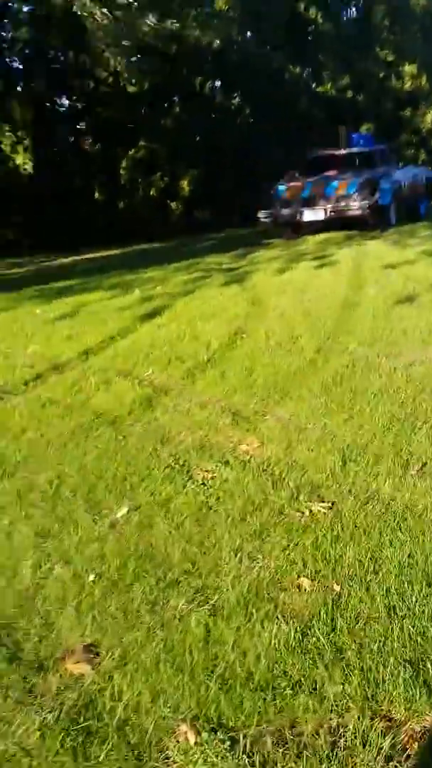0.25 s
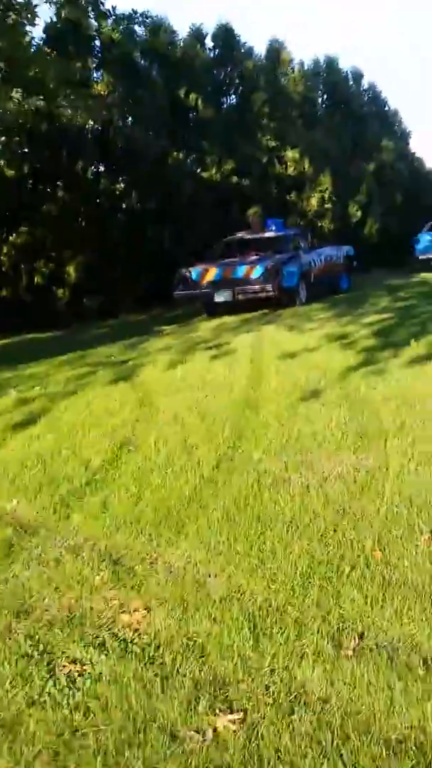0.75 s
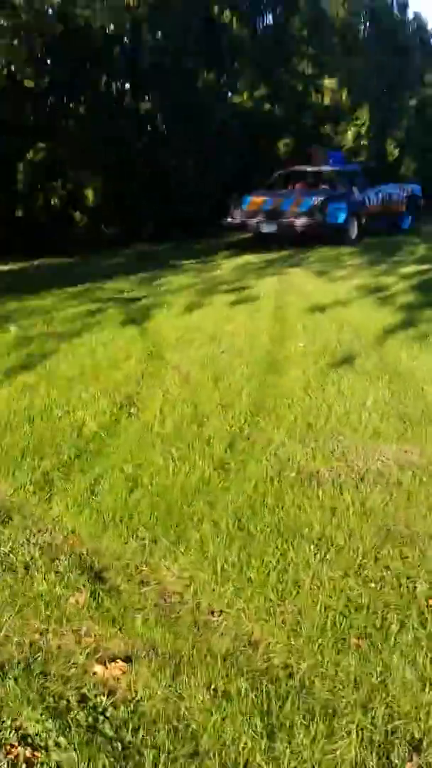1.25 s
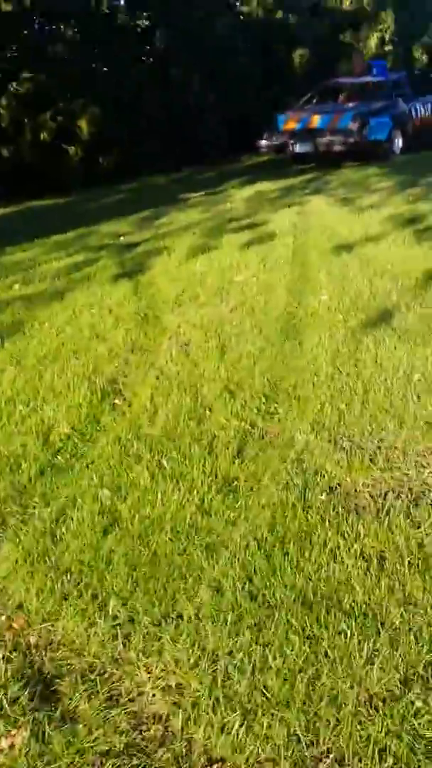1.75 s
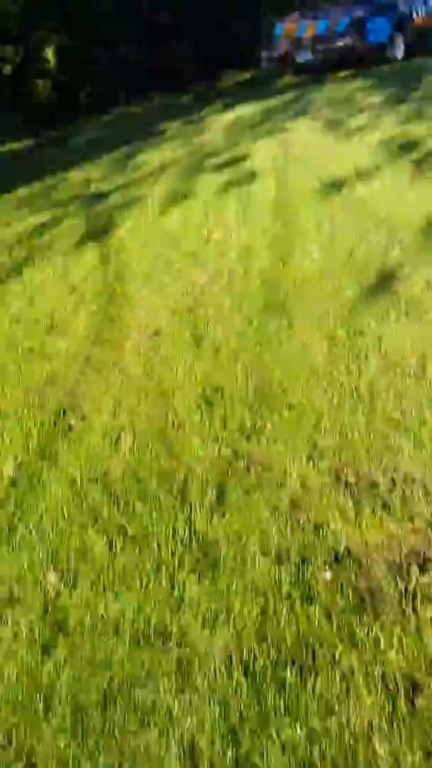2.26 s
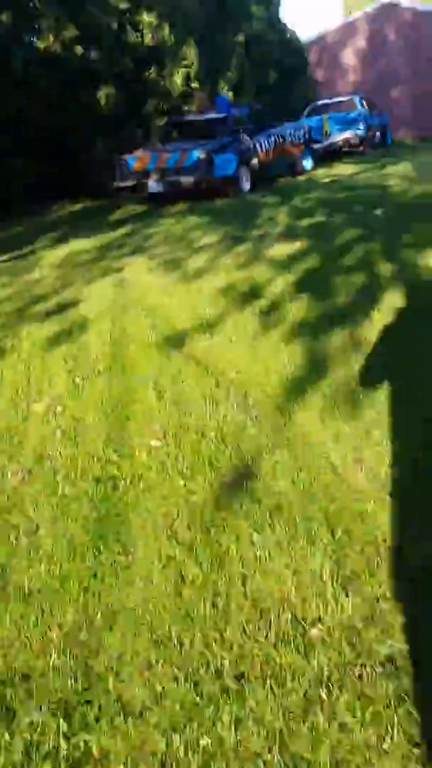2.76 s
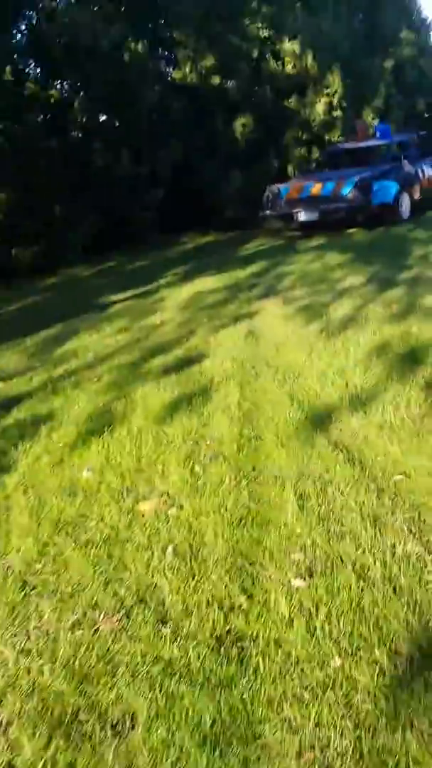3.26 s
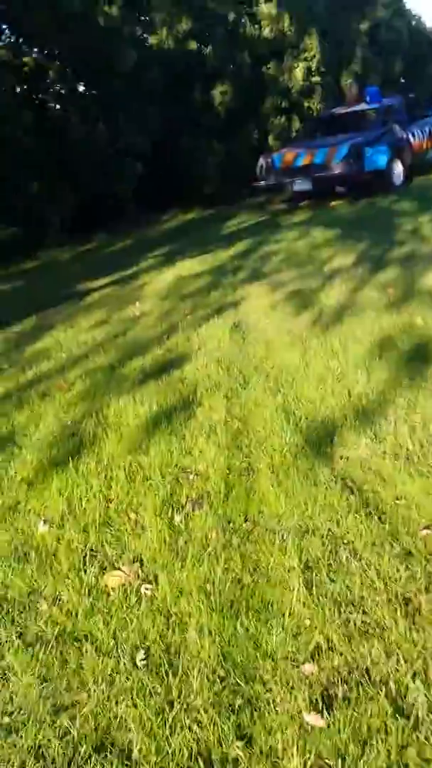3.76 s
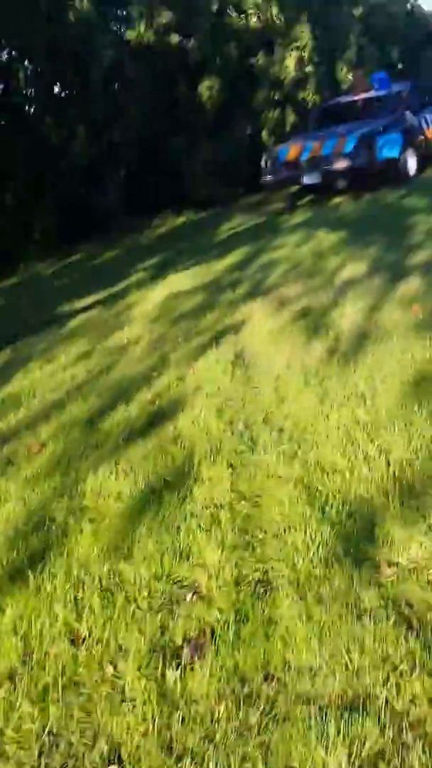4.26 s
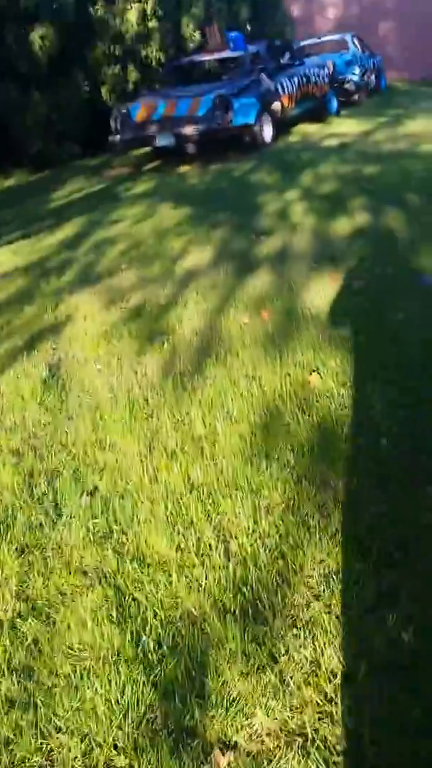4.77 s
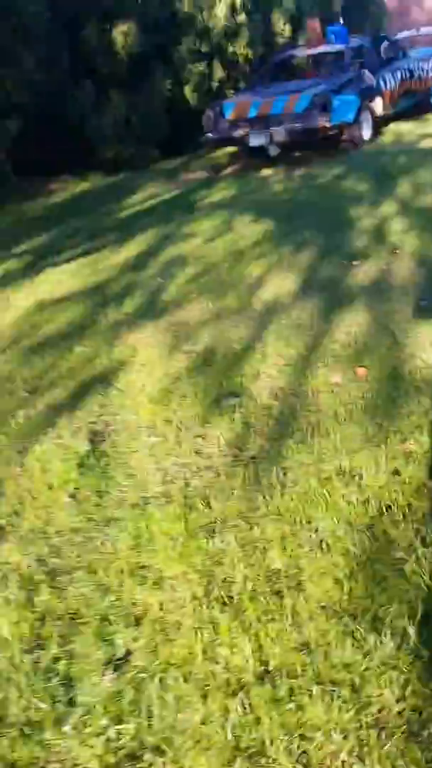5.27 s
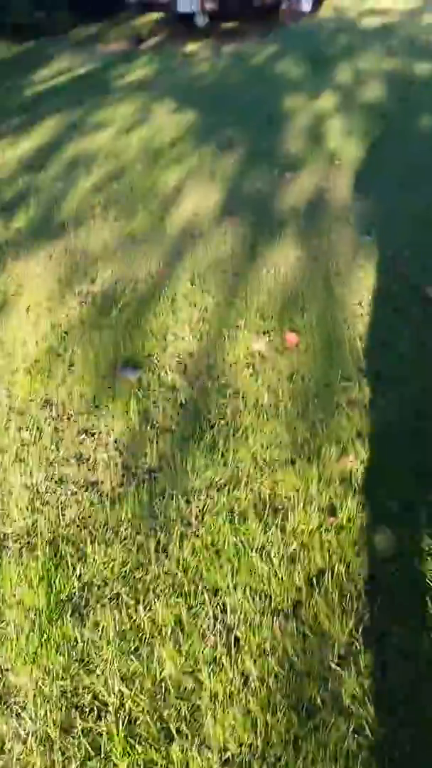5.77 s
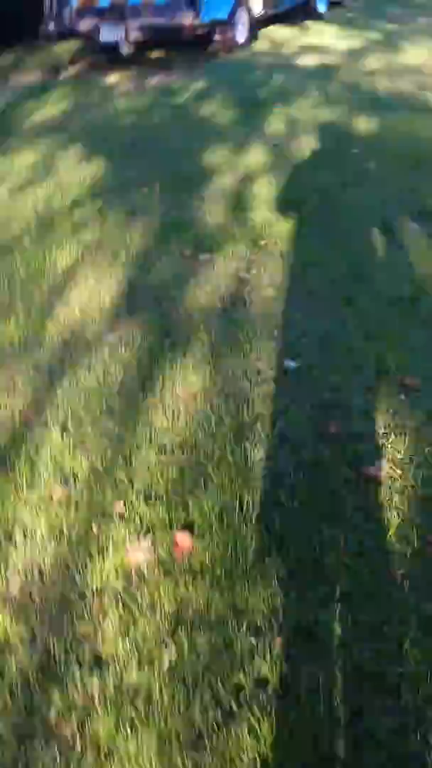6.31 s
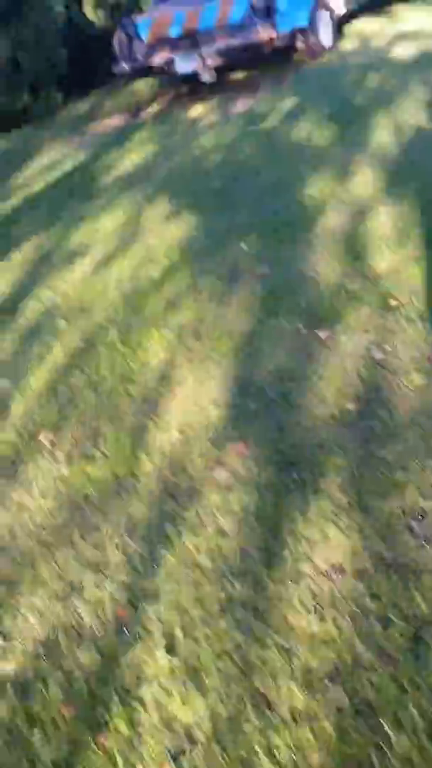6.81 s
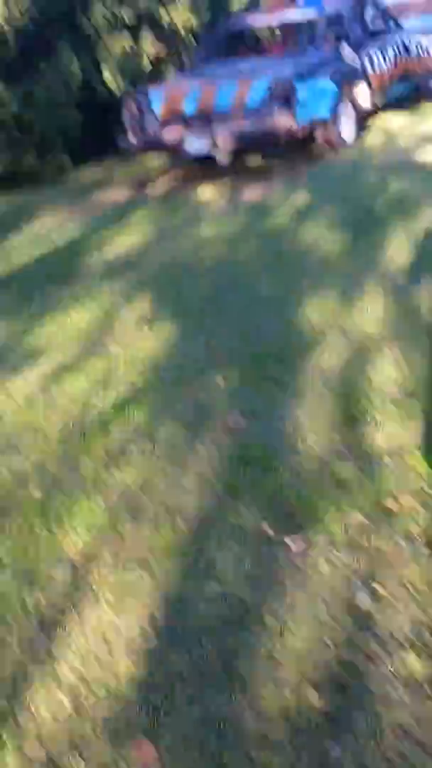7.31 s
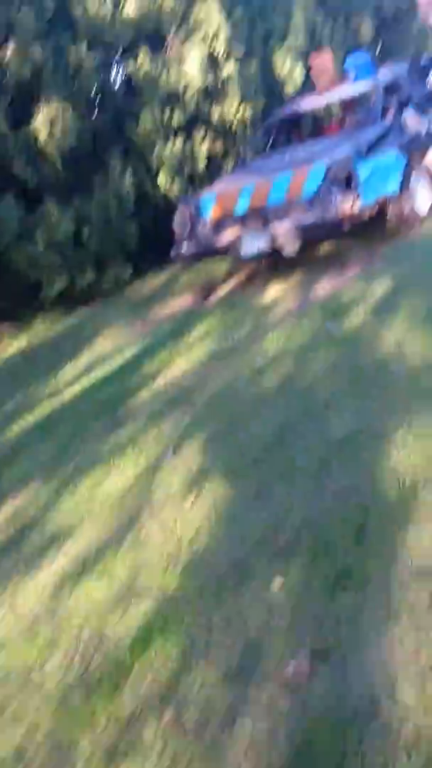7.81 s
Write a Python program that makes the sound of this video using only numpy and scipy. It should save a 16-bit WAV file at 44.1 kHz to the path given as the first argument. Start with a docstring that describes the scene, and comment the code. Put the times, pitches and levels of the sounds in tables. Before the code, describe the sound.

An old eight-cylinder car with open pipes idles loudly as it creeps over a lawn. Its low, uneven rumble carries raspy puffs, a metallic ring and a steady hiss. After a second, sharp exhaust cracks begin; the idle then sags and stumbles now and then while the cracks grow more frequent. One soft step lands in the grass. It is heard from a walking phone some metres away, in a faint breeze.

```python
"""An old eight-cylinder car with open pipes idles and creeps over a lawn, some metres from a walking phone.
From the start each firing booms in the pipes, spits a puff of gas and rings the metal; uneven cylinders
make it lope. Fan and intake hiss underneath, coloured differently by each microphone port, in a faint
breeze. The rasp sings briefly at 0.6 s and twice later. From 1 s some puffs crack; from 2 s the idle
sags and stumbles now and then. A soft step lands in the grass at 5.5 s, and the cracks crowd to the end."""
import sys
import numpy as np
from scipy import signal
from scipy.fft import rfft, irfft, next_fast_len
from scipy.io import wavfile
from scipy.ndimage import uniform_filter1d

SR = 44100
rng = np.random.default_rng(int(sys.argv[2]) if len(sys.argv) > 2 else 0)


def bounce(signal):
    """Save signal as a 16-bit WAV file at the path given by the first command-line argument."""
    frames = np.transpose(np.atleast_2d(signal))
    limited = np.clip(frames, -1, 1)
    pcm = np.round(limited * 32767).astype(np.int16)
    wavfile.write(sys.argv[1], SR, pcm)


N = 355005
T = np.arange(N) / SR
SIZE = next_fast_len(N)
HZ = np.fft.rfftfreq(SIZE, 1 / SR) + 1e-3
STEP, LEFT_LAG = 8, 8  # samples: between envelope points, of delay to the left port
IDLE_PER_S = 44  # firings per s at plain idle

# cylinder strengths in firing order: boom/dB, puff/dB
CYLINDERS = [(-4, 4), (-2, 6.5), (-1.5, 3), (-2, 6.5), (-1, 6), (-2.5, 4.5), (-3, 6), (-1.5, 3.5)]
# the sharpest puffs: t/s, relative level/dB, centre of the spit/Hz
CRACKS = [(1.042, -7, 5530), (1.53, -9, 6300), (1.701, -8, 5470), (1.8746, -6, 6350), (1.941, -6, 5770),
          (1.984, -6.5, 4980), (2.0298, -9, 4910), (2.052, -5, 3930), (2.395, -8, 6070),
          (2.7582, -3.5, 5450), (2.878, -6, 6600), (2.9233, -6, 4770), (2.948, -5, 6020),
          (3.0995, -6.5, 6080), (3.1214, -6, 6660), (3.4795, -6, 6070), (3.6643, -3.5, 6000),
          (3.822, -3.5, 6170), (3.846, -5.5, 5850), (4.025, -4, 6540), (4.208, -7, 6330),
          (4.393, -3.5, 3500), (4.4675, -8, 5580), (4.565, -7.5, 5000), (4.703, -6.5, 4500),
          (4.75, -8, 5000), (4.9256, -7, 5030), (4.95, -7, 6070), (5.25, -6, 5750), (5.3193, -4.5, 5890),
          (5.504, -3, 6550), (5.5485, -3, 5630), (5.6613, -5.5, 5070), (5.687, -4, 5900),
          (5.8032, -11, 6340), (5.851, -3, 5770), (5.8755, -7, 5930), (5.924, -6, 5410), (6.0656, -2, 5150),
          (6.187, -5, 5110), (6.2334, -2.5, 5340), (6.258, -4, 5870), (6.329, -5.5, 4560),
          (6.3733, -6, 6170), (6.445, -7, 6300), (6.635, -2, 4240), (6.7063, -5, 5300), (6.751, -4.5, 6970),
          (6.8216, -2.5, 5110), (6.87, -6, 5440), (6.8933, -2, 5460), (6.985, -2.5, 5590),
          (7.006, -3, 5800), (7.0748, -9, 5610), (7.1626, -0.5, 4050), (7.185, -2, 5990),
          (7.3615, -7, 5720), (7.434, -6.5, 4970), (7.5544, -2, 4470), (7.6001, -3, 6540),
          (7.6271, -8, 5680), (7.746, -6, 5520), (7.8167, -4, 5640), (7.905, -3, 6150),
          (7.9276, -1.5, 5870), (7.997, -5, 5020)]


def undb(db):
    """Gain of a level in dB."""
    return 10 ** (np.asarray(db) / 20)


def unit(x):
    """Scaled to rms 1."""
    return x / np.sqrt(np.mean(x ** 2))


def over_hz(table, hz, column=1):
    """A table read along log frequency."""
    table = np.array(table)
    return np.interp(np.log(hz), np.log(table[:, 0]), table[:, column])


def curves(table):
    """Every column of a table, joined by straight lines in time."""
    s, *columns = np.transpose(table)
    return [np.interp(T, s, c) for c in columns]


def bell(hz, centre_hz, octaves):
    """A bell curve over log frequency, 1 at its centre."""
    return np.exp(-(np.log2(hz / centre_hz) / octaves) ** 2)


def walk(rate):
    """Smooth random drift of spread 1, rate moves per s, one point each STEP."""
    hold, n = int(SR / STEP / rate), len(T[::STEP])
    held = np.repeat(rng.standard_normal(n // hold + 1), hold)
    drift = uniform_filter1d(uniform_filter1d(held, hold), hold)[:n]
    return (drift - drift.mean()) / drift.std()


def slow(rate):
    """A walk drawn out to every sample."""
    return np.interp(T, T[::STEP], walk(rate))


def noise():
    """Spectrum of white noise."""
    return rfft(rng.standard_normal(SIZE))


def swells(table, span):
    """Short swells of noise in a band from hz / span to hz * span."""
    out = 0
    for s, db, hz, length in table:
        bandpass = signal.butter(3, [hz / span, hz * span], "band", fs=SR, output="sos")
        band = unit(signal.sosfilt(bandpass, rng.standard_normal(N)))
        out = out + band * undb(db) * np.exp(-2 * ((T - s) / length) ** 2)
    return out


def load_db(rate, idle_db, per_rate, per_pull):
    """A level that rises with engine speed and with pull, its acceleration over 0.94 s."""
    pull = uniform_filter1d(np.gradient(rate) * SR, int(0.94 * SR))
    return idle_db + per_rate * (rate - IDLE_PER_S) + per_pull * pull


def pipe_tones(count, rate, rumble_db):
    """The even part of the firings hums as a stack of tones tied to the firing rate."""
    # the strongest tone, at twice the firing rate: t/s, level/dB
    octave = [(0, -31), (.25, -23.5), (.6, -20.5), (1.05, -26), (1.4, -25.5), (1.55, -26), (1.8, -21.5),
              (2.35, -27.5), (2.6, -23), (3.06, -23), (3.12, -32), (3.18, -25.5), (4.38, -25.5),
              (4.46, -29.5), (4.68, -23.5), (5.3, -23.5), (5.58, -25.5), (6.05, -22), (6.4, -26),
              (6.52, -22.5), (6.75, -29.5), (7.11, -22.5), (7.6, -22.5), (8.05, -27.5)]
    octave_db, = curves(octave)
    turn = 2 * np.pi * count
    root_db = load_db(rate, -43.5, 0.65, .05) + 2.2 * slow(9)
    tones = undb(root_db) * np.cos(turn + 0.19 * slow(6.6)) - undb(octave_db) * np.cos(2 * turn)
    # the third partial wavers, and fades as it climbs out of the pipe resonance
    third_db = rumble_db - 5.5 - 2.5 * (rate - IDLE_PER_S) + 2.24 * slow(7)
    tones -= undb(third_db) * np.cos(3 * turn + 1.03 * slow(5.5))
    # the two banks beat at high idle: a close pair just above the octave
    lope_db = np.clip(-29 + 18 * (rate - 48.3), -49, -29)
    tones += undb(lope_db) * (np.cos(9 / 4 * turn) + .6 * np.cos(19 / 8 * turn))
    tones += undb(rumble_db - 24.5) * np.cos(13 / 8 * turn)  # undertone
    return np.sqrt(2) * tones


def pipe_rumble(count, memory=0.48, smear_s_per_hz=.001, even_s=.09):
    """Uneven firings kick the pipe resonance; each cylinder carries some strength to its next turn."""
    # pipe resonance: f/Hz, gain/dB
    resonance = [(50, -10), (65, -7), (80, 5.5), (95, 8), (115, 8.5), (140, 3.5), (170, -3), (220, -13.5),
                 (300, -51)]
    at = np.flatnonzero(np.diff(np.floor(count)))
    chance = rng.standard_normal((len(at) // 8 + 1, 8))
    uneven = unit(signal.lfilter([1], [1, -memory], chance, axis=0).ravel()[:len(at)])
    cylinder_db = np.array(CYLINDERS)[(1 + np.arange(len(at))) % 8, 0]
    strength = undb(cylinder_db + 1.4 * np.clip(uneven, -1.6, 1.6))
    kicks = np.zeros(N)
    kicks[at] = strength - strength.mean()
    drive = unit(kicks) + undb(-5) * rng.standard_normal(N)  # gas sloshes between kicks
    smear = np.exp(1j * np.pi * smear_s_per_hz * np.clip(200 - HZ, 0, None) ** 2)  # lows leave later
    response = undb(over_hz(resonance, HZ)) * smear * (HZ > 40)
    rumble = unit(irfft(rfft(drive, SIZE) * response, SIZE)[:N])
    # back pressure evens the level
    window = int(even_s * SR)
    power = uniform_filter1d(uniform_filter1d(rumble ** 2, window), window)
    return unit(rumble / np.sqrt(.15 + power))


def puffs(count, rate, size_db, late_s, width_s=0.0015, tail_s=0.0063):
    """Power of the gas burst around every firing, with a short tail after it."""
    firing = np.round(count).astype(int)
    since = (count - firing) / rate - late_s[firing]
    burst = undb(2 * size_db[firing]) * np.exp(-.5 * (since / width_s) ** 2)
    decay = np.exp(-STEP / (tail_s * SR))
    return burst + 0.13 * signal.lfilter([1 - decay], [1, -decay], burst)


def port_noise():
    """Left and right spectra of the gas noise: partly shared, coloured by each microphone port."""
    # port colour: f/Hz, left/dB, right/dB
    colour = [(165, -73, -79), (270, -65.5, -68), (470, -67, -75.5), (653, -73.5, -63), (897, -61, -59.5),
              (985, -61.5, -64), (1430, -60.5, -61.5), (1930, -61.5, -64), (2810, -53.5, -57.5),
              (3060, -56, -60), (4540, -53, -58.5), (6050, -47.5, -57), (7680, -59, -53),
              (9690, -69.5, -62), (13300, -79.5, -68.5), (15600, -128, -81.5)]
    # likeness of the ports: f/Hz, share of power in common
    likeness = [(200, 1), (450, 0.85), (600, 0.51), (900, 1), (1300, 0.72), (2500, 0.23), (5000, 0.28),
                (8000, 0.015)]
    alike = over_hz(likeness, HZ)
    lag = np.exp(-2j * np.pi * HZ * LEFT_LAG / SR)
    shared = noise()
    pair = np.sqrt(alike) * np.array([shared * lag, shared])
    pair += np.sqrt(1 - alike) * np.array([noise(), noise()])
    return pair * undb([over_hz(colour, HZ, 1), over_hz(colour, HZ, 2)]) * (HZ > 150)


def gas(count, rate, hiss_db, puff_db, band_octaves=.28):
    """Every firing spits with its own strength and colour over the wavering hiss of fan and intake."""
    # puff colour against the hiss: f/Hz, level/dB
    puff_colour = [(200, -27), (500, -16), (900, 0), (1500, -8.5), (5000, -6.5), (12000, -8)]
    # four bands swell and sink: t/s, drone/dB, hollow/dB, rasp/dB, buzz/dB
    band_rides = [(0, 4.5, 4.5, -1.5, 3), (1.25, 8, 1.5, -2, 2), (2.2, 3, -1.5, -4.5, -3),
                  (3.2, 1, 4, -3, 1), (3.8, 0.5, 0.5, -8, -2), (4.3, 1, 0.5, -1, -2),
                  (5.2, 3.5, -5, 3.5, -1.2), (5.8, 2, -1, -2.5, -1.7), (6.9, -4, 2.5, -2.5, -1.5),
                  (7.3, 1, 3, 0, -3.5), (8.05, -3, 2.5, 2, -3)]
    rides_db = curves(band_rides) + [load_db(rate, -0.69, 0.46, 0.027)]  # the fifth is the sizzle
    rides = list(zip(rides_db, (350, 615, 810, 1550, 9000), (0.49, 0.42, 0.42, 1.0, 0.92)))
    firings = int(count[-1]) + 2
    force, timing = np.clip(rng.standard_normal((firings, 2)).T, -2.5, 0.4)
    strength_db = np.array(CYLINDERS)[np.arange(firings) % 8, 1] + 3.4 * force
    late_s = -.001 + 0.00084 * timing
    scatter_db = np.full(firings, 4.2)
    # each crack takes over a nearby firing
    crack_s, crack_db, spit_hz = np.transpose(CRACKS)
    place = np.interp(crack_s, T, count)
    cracked = np.round(place + .06).astype(int)
    strength_db[cracked] = crack_db - np.interp(crack_s, T, hiss_db + puff_db) - 5.5
    late_s[cracked] = (place - cracked) / np.interp(crack_s, T, rate) + .001
    scatter_db[cracked] = 1.2  # a crack is sharp in every band
    pair = port_noise()
    out, waver, lull = 0, walk(9), crack_lulls()
    for centre in 170 * 2 ** np.arange(0, 6.7, band_octaves):
        band = np.cos(np.pi / 2 * np.clip(np.log2(HZ / centre) / band_octaves, -1, 1)) ** 2
        colour_db = scatter_db * np.clip(rng.standard_normal(firings), -2, 1.2)
        colour_db += over_hz(puff_colour, centre)
        colour_db[cracked] += 5.5 * bell(centre, spit_hz, octaves=0.8)
        hiss = lull * undb(2 * (0.31 * waver + 1.8 * walk(24)))
        bursts = puffs(count[::STEP], rate[::STEP], strength_db + colour_db, late_s)
        power = hiss + undb(2 * puff_db[::STEP]) * bursts
        # the load sets the slow level, so only the quick beat is kept
        beat = np.sqrt(power / uniform_filter1d(power, SR // STEP // 3))
        # echoes from ground and hedge shift as the phone walks: each band drifts
        drift_db = 0.33 * walk(2.58)
        drift_db += sum(db[::STEP] * bell(centre, hz, octaves) for db, hz, octaves in rides)
        # the band flickers differently at each port
        gains = [np.interp(T, T[::STEP], beat * undb(drift_db + 1.15 * walk(30))) for port in pair]
        out = out + irfft(pair * band, SIZE)[:, :N] * gains
    return unit(near_echoes(out)) * undb(hiss_db + 3.5)


def near_echoes(pair):
    """Body and lawn send dulled copies back within a few ms; the lawn's echo comes and goes."""
    # echo off the walker's body: t/s, left delay/ms, right delay/ms
    body_delays = [(0, 0.93, 0.46), (2.2, 0.83, 0.51), (3.5, 0.91, 0.65), (5.0, 0.93, 0.84),
                   (5.8, 0.667, 0.834), (6.3, 0.81, 1), (8.05, 0.97, 0.95)]
    out = []
    for direct, body_ms in zip(pair, curves(body_delays)):
        dull = signal.sosfilt(signal.butter(2, 8000, fs=SR, output="sos"), direct)
        body = undb(-12) * np.interp(T - body_ms / 1000, T, dull)
        lawn_ms = 1.8 + .25 * slow(5)
        lawn = undb(-11) * np.tanh(slow(12)) * np.interp(T - lawn_ms / 1000, T, dull)
        out.append(direct + body + lawn)
    return np.array(out)


def pipe_rings(count, level_db, pitch_memory=0.533, attack_s=0.0012):
    """Each firing rings the pipe metal briefly, at a pitch and strength of its own."""
    # modes of the metal: f/Hz, relative pitch spread, left/dB, right/dB, t60/s
    modes = [(880.6, 0.049, -18.5, -16, 0.052), (1413, 0.089, -11, -15, 0.02),
             (2830, 0.093, -3, -11, 0.035), (4440, 0.096, 4, -18, 0.025), (5710, 0.088, 4, -26, 0.02),
             (7170, 0.074, -20, -6, 0.022)]
    out = np.zeros((2, N + 2048))
    age = np.arange(2048 - LEFT_LAG) / SR
    at = np.flatnonzero(np.diff(np.floor(count + 0.0514)))
    for hz, spread, left_db, right_db, t60 in modes:
        detune, force = rng.standard_normal((len(at), 2)).T
        detune = unit(signal.lfilter([1], [1, -pitch_memory], detune))
        strength = undb(level_db[at] + 6.3 * np.clip(force, -2, 1.05))
        envelope = undb(-60 * age / t60) * (1 - np.exp(-age / attack_s))
        for i, pitch_hz, gain in zip(at, hz * (1 + spread * detune), strength):
            ring = gain * envelope * np.sin(2 * np.pi * pitch_hz * age)
            out[0, i + LEFT_LAG:i + LEFT_LAG + len(age)] += undb(left_db) * ring
            out[1, i:i + len(age)] += undb(right_db) * ring
    return out[:, :N]


def breeze():
    """Air on the ports makes a faint low flutter, partly different at each."""
    # flutter colour: f/Hz, gain/dB
    colour = [(20, 4), (60, 6), (200, -33)]
    pair = noise() + 0.21 * np.array([noise(), noise()])
    flutter = irfft(pair * undb(over_hz(colour, HZ)) * (HZ > 15) * (HZ < 250), SIZE)[:, :N]
    return unit(flutter) * undb(-52 + 2 * slow(2.85))


def singing_rasp():
    """The rasp briefly sings on a narrow metallic note, mostly on the left."""
    # notes: t/s, left rms at the top/dB, f/Hz, length/s
    notes = [(0.64, -20, 5830, 0.05), (1.06, -23, 5560, 0.05), (4.49, -21, 5700, 0.05)]
    return swells(notes, span=1.03) * undb([[0], [-11]])


def crack_lulls(depth=0.39, ahead_s=0.0079, width_s=0.0097):
    """The hiss power ducks for a moment just before each crack."""
    gap = T[::STEP, None] - (np.array(CRACKS)[:, 0] - ahead_s)
    return 1 - depth * np.exp(-.5 * (gap / width_s) ** 2).max(axis=1)


def stumbles(width_s=0.007):
    """Gain that dips briefly wherever the engine stumbles."""
    # stumbles: t/s, dip/dB
    dips = [(2.042, -4.5), (2.753, -5), (6.201, -5), (6.628, -0.5), (6.814, -2), (7.402, -1.5), (7.543, -4),
            (7.737, -7)]
    return undb(sum(db * np.exp(-.5 * ((T - s) / width_s) ** 2) for s, db in dips))


def footstep():
    """A foot lands in the grass with a soft thump of low noise."""
    # thump: t/s, rms at the top/dB, f/Hz, length/s
    thump = [(5.51, -32, 290, 0.07)]
    return swells(thump, span=1.6)


def scene():
    """One crank drives boom, gas and rings; pipes and step reach both ports nearly alike."""
    # crank speed: t/s, firing rate/Hz
    crank_speed = [(0.0, 50.81), (0.51, 49.87), (0.76, 48.38), (1.09, 49.69), (1.52, 48.34), (1.92, 44.94),
                   (2.35, 47.17), (2.77, 41.54), (3.09, 45.65), (3.61, 43.52), (4.08, 44.51), (4.54, 41.62),
                   (4.88, 44.78), (5.21, 42.74), (5.54, 44.24), (5.94, 41.59), (6.55, 42.56), (6.83, 42.43),
                   (6.9, 42.2), (7.0, 44.6), (7.28, 45.8), (7.42, 41.8), (7.78, 41.8), (7.95, 45),
                   (8.05, 45.72)]
    # puffs stand out as the phone nears and when the engine sags: t/s, hiss/dB, puffs over hiss/dB
    gas_levels = [(0, -23.5, 2.5), (1.2, -22.5, 4.5), (2.3, -22.5, 5), (2.75, -22.5, 4.5), (3.15, -21, 3),
                  (3.9, -21.5, 5), (5.0, -21, 3.5), (5.5, -21, 5), (5.8, -21.5, 7), (6.4, -22, 4.5),
                  (7.15, -20.5, 6.5), (7.4, -22.5, 6), (8.05, -20.5, 6.5)]
    rate, = curves(crank_speed)
    hiss_db, puff_db = curves(gas_levels)
    count = .07 + np.cumsum(rate) / SR  # firings so far
    rumble_db = load_db(rate, -27.5, 0.65, 0.045)
    boom = pipe_tones(count, rate, rumble_db) + undb(rumble_db) * pipe_rumble(count)
    sway = undb(.28 * slow(3.8) * np.array([[1], [-1]]))  # the swaying phone tips the boom left and right
    engine = boom * sway + gas(count, rate, hiss_db, puff_db) + pipe_rings(count, hiss_db + puff_db)
    return engine * stumbles() + footstep() + breeze() + singing_rasp()


def record(dry):
    """The phone rounds the loudest peaks and cuts the top."""
    lowpass = signal.ellip(12, .2, 98, 15300, fs=SR, output="sos")
    return signal.sosfilt(lowpass, np.tanh(1.1 * dry) / 1.1)


dry = scene()
out = record(dry)
bounce(out)
```